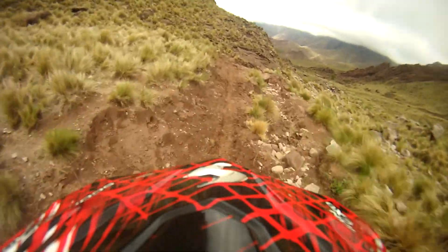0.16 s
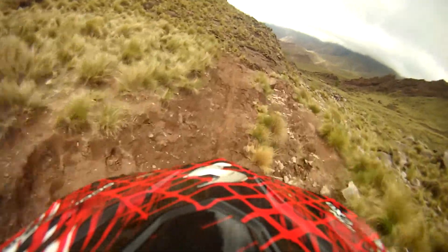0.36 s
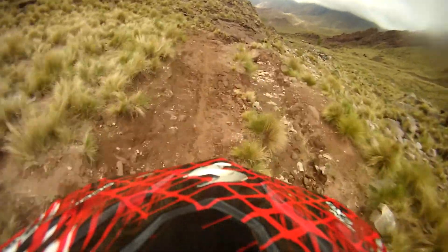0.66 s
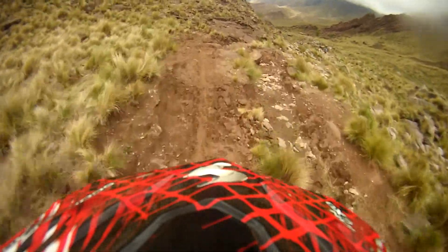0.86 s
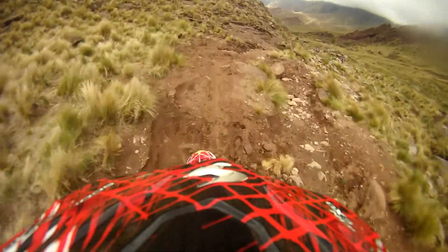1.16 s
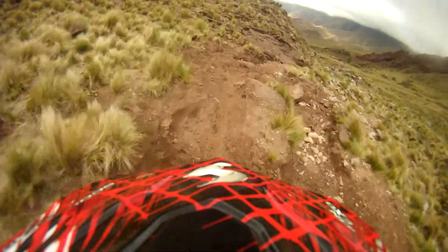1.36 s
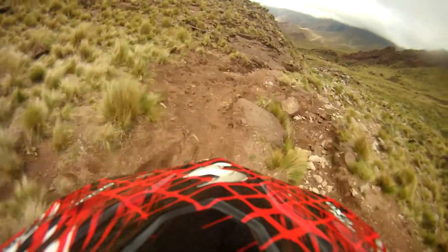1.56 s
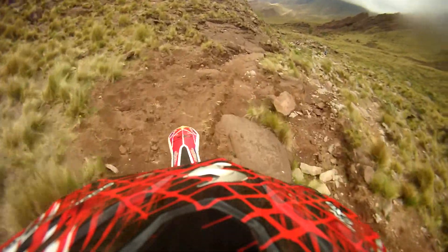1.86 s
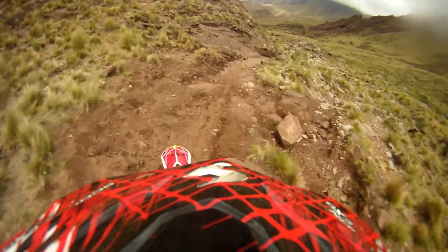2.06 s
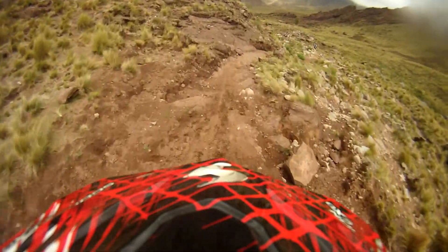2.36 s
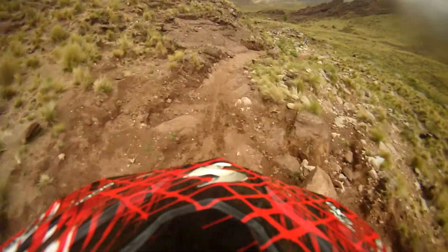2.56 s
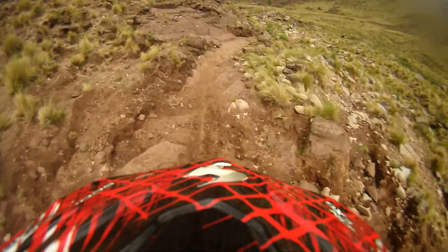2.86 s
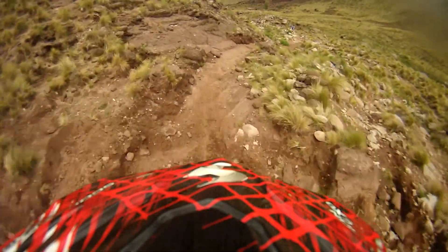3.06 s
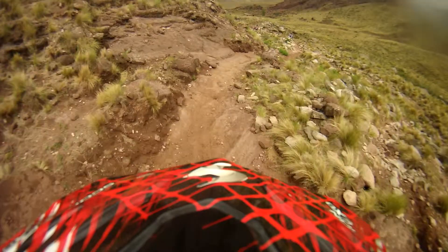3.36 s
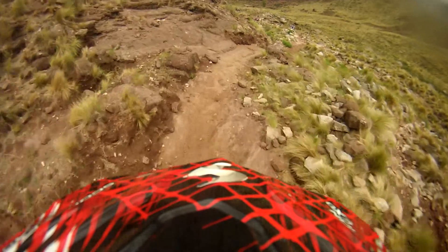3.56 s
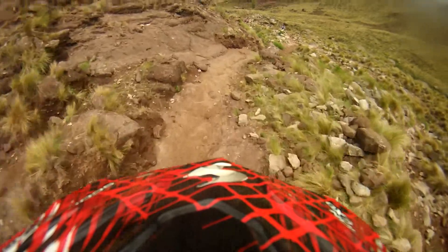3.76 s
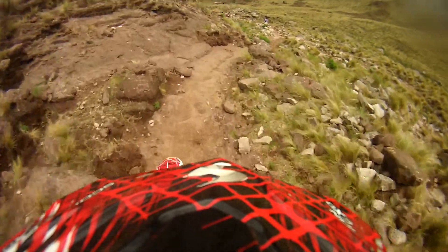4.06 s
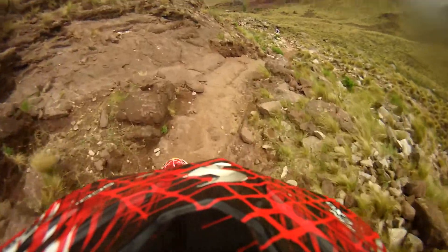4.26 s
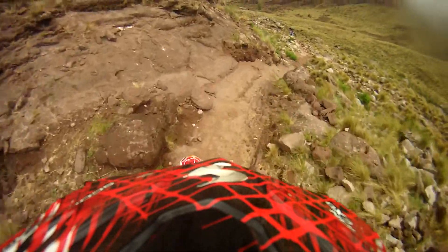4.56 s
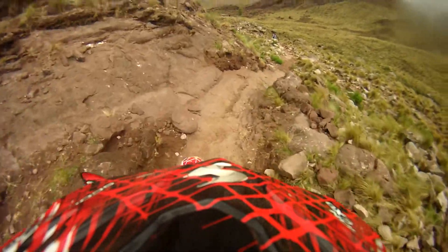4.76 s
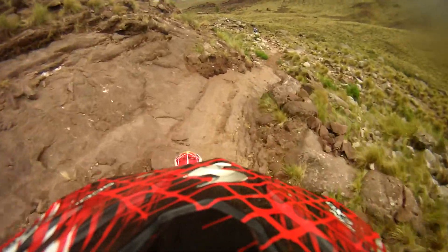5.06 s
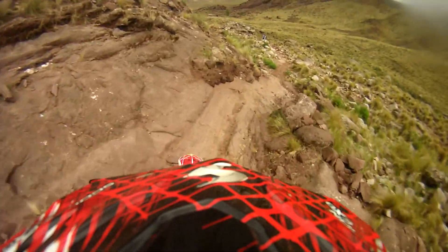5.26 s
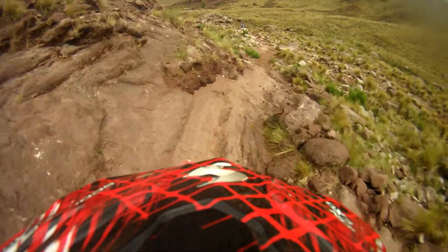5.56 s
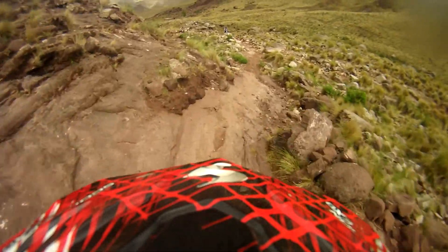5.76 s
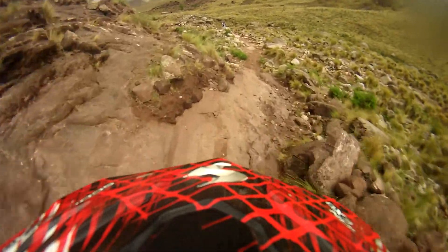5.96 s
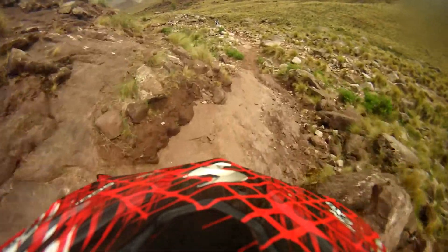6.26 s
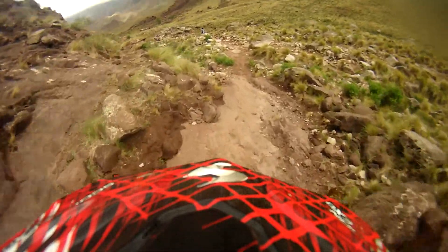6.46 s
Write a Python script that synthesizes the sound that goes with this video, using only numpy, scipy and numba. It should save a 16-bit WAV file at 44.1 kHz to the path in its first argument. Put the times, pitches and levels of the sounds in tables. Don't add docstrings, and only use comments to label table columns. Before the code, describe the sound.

A single-cylinder dirt bike climbs a rocky mountain trail, heard through a sealed case on the rider's helmet. It begins with fast, rattling firing under heavy wind thumps, hollow booms and breathy vent whistles. After a brief missed firing the wind eases and revs sag unevenly into slow, distinct chugs. A few stones tick on plastic. Near the end another firing fails, then the engine picks up with a last rattle.

```python
import sys
import numpy as np
from scipy import signal
from scipy.fft import rfft, irfft
from scipy.io import wavfile
from scipy.ndimage import uniform_filter1d
from numba import njit

SR = 44100
rng = np.random.default_rng(int(sys.argv[2]) if len(sys.argv) > 2 else 0)


def field_ratio(decibels):
    return 10 ** (np.asarray(decibels, dtype=float) / 20)


def dump(signal):
    limited = np.clip(np.atleast_2d(signal).T, -1, 1)
    pcm = np.round(limited * 32767).astype(np.int16)
    wavfile.write(sys.argv[1], SR, pcm)


N = 292383

SHUDDER_DB = -50

# (time [s], buffet [dB], hollow over buffet [dB], rise [s], fall [s])
GUSTS = [(.05, -31.5, -6, 0.65, 0.2), (.9, -32.5, -8.5, 0.16, 0.29), (1.07, -35, 8, 0.14, .13),
         (1.2, -34.5, -10, 0.16, 0.16), (1.68, -41.5, -1.5, .15, 0.29), (1.92, -33.5, -9, 0.25, 0.22),
         (2.12, -33.5, -7.5, 0.15, 0.091), (2.68, -42, -25, 0.17, 0.17), (3.05, -38, -10, 0.41, 0.32),
         (3.45, -41.5, -15, 0.53, 0.61), (5.1, -44.5, -13, 0.31, .5), (5.9, -43, -25, 0.53, 0.27)]
CALM_BUFFET_DB, CALM_HOLLOW_DB = -54, -57
# (frequency [Hz], density [dB per Hz])
BUFFET_SPECTRUM = [(20, -4.5), (60, -6), (120, -4), (200, -11.5), (400, -24.5), (800, -37), (1600, -73.5),
                   (3200, -88.5)]
# (time [s], level [dB], centre [Hz], rise [s], fall [s])
WHISTLES = [(.07, -38, 806, 0.037, 0.06), (.6, -44.5, 704, .15, 0.27), (.98, -42.5, 828, 0.089, 0.19),
            (1.14, -41.5, 824, .05, 0.071), (1.33, -47.5, 727, .05, 0.071), (1.62, -38.5, 786, 0.049, 0.17),
            (1.82, -49, 750, 0.037, 0.067), (2.2, -50.5, 768, 0.17, 0.14), (2.88, -51, 820, 0.16, 0.084),
            (3.2, -52, 800, 0.07, 0.18), (3.39, -57, 750, .04, 0.029), (3.66, -48, 823, 0.091, 0.1),
            (4.52, -57, 824, .15, 0.14), (4.9, -52.5, 868, 0.42, .2), (5.36, -52.5, 817, 0.15, .2),
            (6.2, -53, 917, 0.59, 0.3)]
QUIET_VENT_DB = -58.5

# (time [s], peak [dB], ring [Hz], t60 [s], squeak over peak [dB])
TICKS = [
    (0.627, -28, 1140, 0.022, -32),
    (1.104, -39, 1040, 0.035, -20.5),
    (2.458, -30, 1137, 0.026, -40),
    (3.402, -44.5, 2440, 0.042, -11),
    (3.5245, -40.5, 2480, 0.024, -11),
    (3.532, -35, 2616, 0.024, -30),
    (6.587, -42, 920, 0.024, -30),
]

# (centre [Hz], width [Hz], level [dB])
CASE_MODES = [(499, 79, -3), (735, 118, -1), (964, 170, 0), (1109, 55, -13), (1675, 51, -8),
              (2030, 180, -11.5), (2280, 285, 2.5), (2510, 355, -6.5), (2840, 190, -17)]
# (time [s], rattle [dB], rise [s], fall [s])
JOLTS = [
    (0, -49, .05, 0.11),
    (.75, -55.5, 0.23, 0.23),
    (1.09, -45.5, 0.14, 0.29),
    (1.78, -52, 0.22, 0.25),
    (3.4, -52, 0.024, .03),
    (3.6, -58, 0.43, 0.45),
    (4.9, -60, 0.89, 1),
    (6.63, -54.5, 0.77, .1),
]
IDLE_RATTLE_DB, RATTLE_DB_PER_HZ = -58, 0.46
# (time [s], buzz over rattle [dB], rise [s], fall [s])
BUZZES = [
    (0, 0, 0.096, .04),
    (.58, -2, 0.09, 0.2),
    (1.04, 0.5, 0.065, 0.038),
    (1.83, -6.5, .04, 0.031),
    (2.05, -13, .1, 0.082),
    (2.92, 3, 0.16, 0.067),
    (3.25, -3, .08, 0.055),
    (3.7, 1, 0.046, 0.13),
    (4.78, 0.5, 0.11, .05),
    (6.25, -4, 0.24, .2),
]
QUIET_BUZZ_DB = -9.5

# (time [s], firing rate [Hz])
REVS = [(0.0, 21.64), (0.192, 24.29), (0.679, 23.0), (1.074, 20.01), (1.454, 23.46), (1.819, 17.54),
        (2.363, 15.76), (2.861, 20.33), (3.342, 16.95), (3.55, 18.1), (4.223, 14.8), (4.445, 15.25),
        (4.948, 14.18), (5.009, 16.12), (5.389, 14.28), (6.048, 15.83), (6.105, 15.14), (6.63, 18.32)]
START_CYCLE, IDLE_HZ = -.36, 15
# (time [s], level [dB])
LOAD = [(0, -3), (.45, -0.5), (1.4, 3), (1.62, 0), (2.0, -1.5), (2.3, 1.5), (2.7, 1), (3.1, -3.5), (3.4, 2),
        (3.7, -2), (3.9, 1.5), (4.3, -0.7), (5.0, 2.5), (5.3, -1), (5.85, 0.6), (6.1, 3), (6.63, 3)]
# (time [s], depth [dB])
MISFIRES = [
    (1.62, -30),
    (2.607, -9),
    (3.931, -7),
    (6.119, -20),
]
PUFF_DB, SILENCER_HZ, AIRBOX_HZ = -33.5, 238, 262

HISS_DB = -77


def curve(table):
    time_s, *columns = np.transpose(table)
    return [np.interp(np.arange(N) / SR, time_s, column) for column in columns]


def unit(x):
    return x / np.sqrt(np.mean(x ** 2))


@njit
def svf(x, hz, width_hz):
    y, band_state, low_state = np.empty(len(x)), 0., 0.
    for i in range(len(x)):
        g = np.tan(np.pi * hz[i] / SR)
        damping = width_hz / hz[i]
        v = (band_state + g * (x[i] - low_state)) / (1 + g * (g + damping))
        band_state = 2 * v - band_state
        low_state = low_state + 2 * g * v
        y[i] = damping * v
    return y


def band(x, hz, width_hz):
    hz = hz * np.ones(len(x))
    return svf(svf(x, hz, 1.49 * width_hz), hz, 1.49 * width_hz)


def walk(rate_hz):
    hold = int(SR / rate_hz)
    steps = np.repeat(rng.standard_normal(N // hold + 1), hold)
    return 1.7 * uniform_filter1d(uniform_filter1d(steps, hold), hold)[:N]


def swells(rows, floor_db):
    t = np.arange(N) / SR
    power = field_ratio(2 * floor_db)
    for time_s, db, rise_s, fall_s in rows:
        before = (time_s - t) / max(rise_s, .01)
        after = (t - time_s) / max(fall_s, .01)
        power = power + field_ratio(2 * db - 20 * np.where(t < time_s, before, after))
    return 10 * np.log10(power)


def shudder():
    return unit(band(rng.standard_normal(N), 30., 30.)) * field_ratio(SHUDDER_DB + 1.6 * walk(5))


def buffeting(buffet_db):
    f = np.maximum(np.arange(N // 2 + 1) * SR / N, 1)
    hz, db = np.transpose(BUFFET_SPECTRUM)
    colour = field_ratio(np.interp(np.log(f), np.log(hz), db)) * np.minimum(f / 12, 1)
    thumps = unit(irfft(rfft(rng.standard_normal(N)) * colour, N))
    return thumps * field_ratio(1.2 * buffet_db + 8.5 + 1.5 * walk(18))


def hollow_boom(hollow_db):
    rush = rng.standard_normal(N)
    core = np.clip((hollow_db + 42) / 13, 0, 1)
    boom = (1 - .6 * core) * unit(band(rush, 270., 180.)) + core * unit(band(rush, 270., 55.))
    return boom * field_ratio(1.1 * hollow_db + 3.5 + 1.6 * walk(20))


def vent_whistle():
    time_s, db, hz, rise_s, fall_s = np.transpose(WHISTLES)
    vent_db = swells(zip(time_s, db, rise_s, fall_s), QUIET_VENT_DB)
    vent_hz = curve(list(zip(time_s, hz)))[0]
    return unit(band(rng.standard_normal(N), vent_hz, 80.)) * field_ratio(vent_db - 3 + 1.5 * walk(15))


def wind():
    time_s, db, over_db, rise_s, fall_s = np.transpose(GUSTS)
    buffet_db = swells(zip(time_s, db, rise_s, fall_s), CALM_BUFFET_DB)
    hollow_db = swells(zip(time_s, db + over_db, rise_s, fall_s), CALM_HOLLOW_DB)
    return buffeting(buffet_db) + hollow_boom(hollow_db) + vent_whistle()


def stones():
    out, t = np.zeros(N + SR), np.arange(SR // 16) / SR
    for time_s, db, ring_hz, t60_s, squeak_db in TICKS:
        noise = rng.standard_normal(len(t))
        onset = np.sin(np.pi / 2 * np.minimum(t / .0016, 1)) ** 2
        fade = np.exp(-np.log(1000) * t / max(t60_s, .005)) * onset
        ring = np.minimum(t / 0.0052, 1) * 2.0 * np.sin(2 * np.pi * ring_hz * t)
        rasp = 0.38 * unit(band(noise, 2200., 500.))
        squeak_noise = unit(band(noise, 4850., 300.) + .3 * band(noise, 5600., 900.))
        squeak = np.exp(-((t - .01) / .008) ** 2) * squeak_noise
        snap_noise = .6 * unit(band(noise, 1700.0, 602.0)) + .25 * unit(band(noise, 5300., 900.))
        snap = (t / .0012) * np.exp(-t / 0.0013) * snap_noise
        out[int(time_s * SR):][:len(t)] += field_ratio(db) * (fade * (ring + rasp) + field_ratio(squeak_db) * squeak + snap)
    return out[:N]


def crank():
    cycles = START_CYCLE + np.cumsum(curve(REVS)[0]) / SR
    return np.interp(np.arange(int(cycles[-1]) + 1), cycles, np.arange(N) / SR), cycles


def rattle():
    running_db = IDLE_RATTLE_DB + RATTLE_DB_PER_HZ * (curve(REVS)[0] - IDLE_HZ)
    level_db = swells(JOLTS, running_db)
    turn = 2 * np.pi * crank()[1]
    beat_db = 1.4 * np.cos(turn - .6) + 0.55 * np.cos(2 * turn - 3.5)
    grains = rng.standard_normal(N) * field_ratio(2.4 * np.minimum(rng.exponential(size=N), 6))
    modes = sum(field_ratio(db + 1.26 * walk(9)) * unit(band(grains, hz, width_hz)) for hz, width_hz, db in CASE_MODES)
    modes += field_ratio(swells(BUZZES, QUIET_BUZZ_DB)) * unit(band(grains, 1345., 40.))
    modes += field_ratio(-9) * unit(band(grains, 5260.0, 800.))
    return modes * field_ratio(level_db + beat_db - 2.0)


def strike(times_s, db, shape, lead_s):
    train = np.zeros(N + SR)
    index = ((times_s - lead_s) * SR).astype(int) + SR // 2
    np.add.at(train, np.clip(index, 0, N + SR - 1), field_ratio(db))
    return signal.fftconvolve(train, shape)[SR // 2:SR // 2 + N]


def exhaust_puff(t):
    mid = t - .008
    outflow = 1.32 * np.exp(-((mid - .0005) / .0022) ** 2)
    return outflow - .87 * np.cos(2 * np.pi * SILENCER_HZ * mid) * np.exp(-(mid / .005) ** 4)


def intake_gulp(t):
    top = t - .008
    flow = np.exp(-(top / .0027) ** 2) - .74 * np.exp(-((top - .0094) / .0076) ** 2)
    ring_fade = np.exp(-(top / np.where(top < 0, .0019, .0095)) ** 2)
    return flow + .9 * np.cos(2 * np.pi * AIRBOX_HZ * (top + .0011)) * ring_fade


def pumping(cycles):
    revs = np.clip(np.gradient(cycles) * SR / IDLE_HZ - 1, 0, 1)
    cycle_swing = .34 * np.cos(2 * np.pi * (cycles - .515))
    return cycle_swing + (.04 + .3 * revs) * np.cos(4 * np.pi * (cycles - .76))


def engine():
    fire_s, cycles = crank()
    period_s = np.gradient(fire_s)
    late_chance, puff_chance, gulp_chance = rng.standard_normal((len(fire_s), 3)).T
    db = PUFF_DB + np.interp(fire_s, *np.transpose(LOAD))
    db += sum(depth_db * (abs(fire_s - time_s) < period_s / 2) for time_s, depth_db in MISFIRES)
    t = np.arange(SR // 30) / SR
    late_s = np.minimum(.37 * period_s - .0067, .16 * period_s + .0058) + .0003 * late_chance
    puffs = strike(fire_s, db + .9 * puff_chance, exhaust_puff(t), .0061)
    gulps = strike(fire_s + late_s, db + 1.2 * gulp_chance, intake_gulp(t), .008)
    return puffs + gulps + field_ratio(PUFF_DB + curve(LOAD)[0]) * pumping(cycles)


def scene():
    return (shudder() + wind() + stones() + rattle() + engine())[None]


def band_limit(x):
    return signal.sosfilt(signal.butter(12, 15730, fs=SR, output="sos"), x)


def record(dry):
    muffled = signal.sosfilt(signal.butter(4, 3050, fs=SR, output="sos"), dry)
    hiss = field_ratio(HISS_DB) * rng.standard_normal(dry.shape)
    return band_limit(muffled + hiss)


dry = scene()
out = record(dry)
dump(out)
```